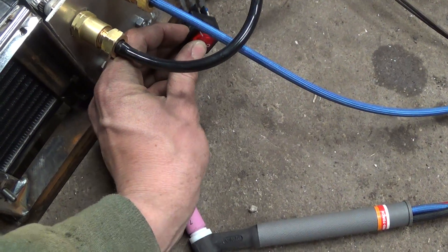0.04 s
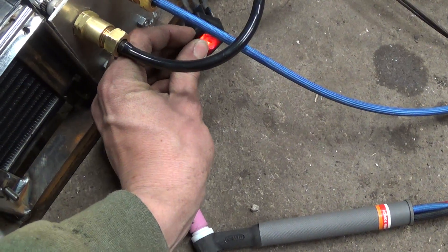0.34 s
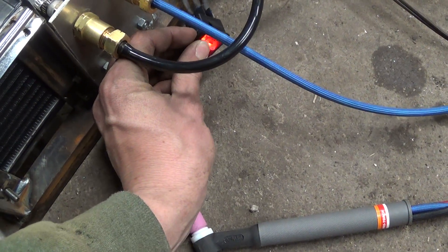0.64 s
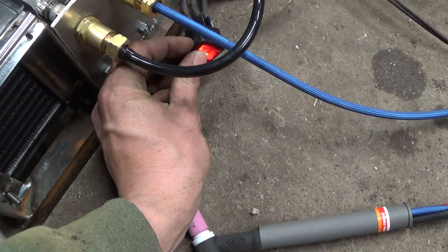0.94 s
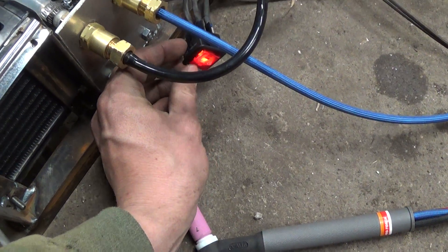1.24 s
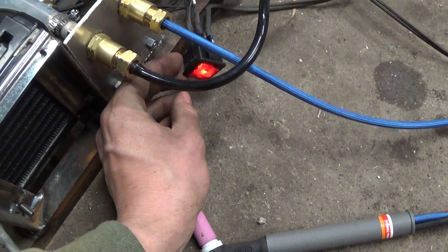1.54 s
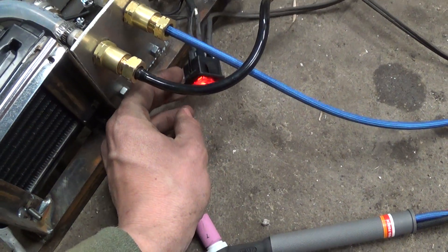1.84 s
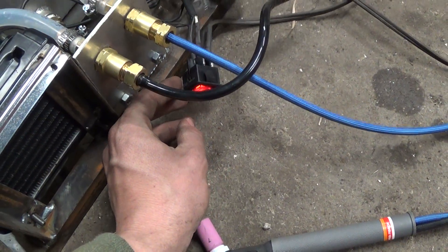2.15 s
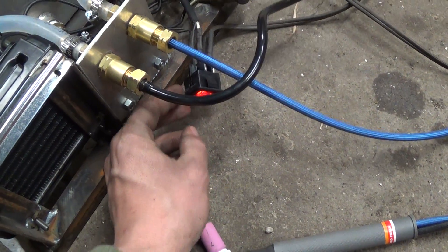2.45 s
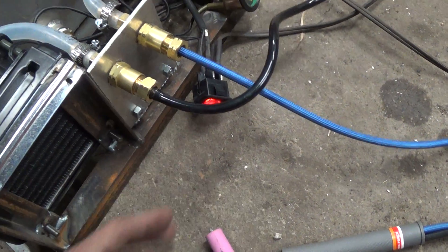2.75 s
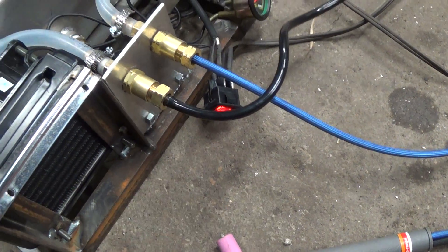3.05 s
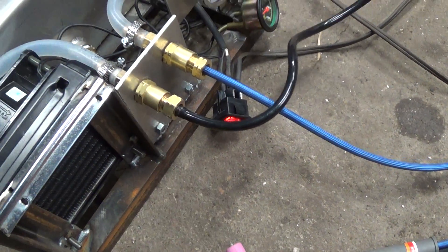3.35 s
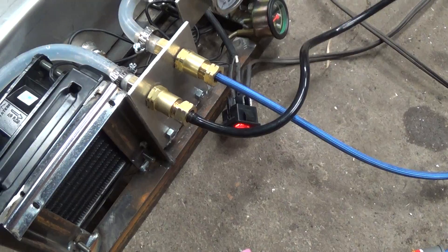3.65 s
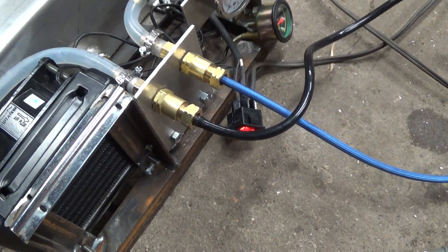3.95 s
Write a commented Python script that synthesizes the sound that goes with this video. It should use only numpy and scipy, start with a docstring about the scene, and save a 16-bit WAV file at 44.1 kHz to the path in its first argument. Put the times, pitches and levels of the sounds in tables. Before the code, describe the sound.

A small coolant pump and fan hum and whir close by in a quiet workshop. After a near-silent start, a rocker switch snaps at about 0.4 seconds and the motor comes on with a brief whoosh. A steady low hum, rushing air, fine crackle and light rattle continue until 4 seconds. The hiss brightens slightly from 1.5 seconds, with scattered small ticks, faint squeaks and a soft rub around 3.4.

```python
"""A faint tick in a quiet workshop, then a rocker switch snaps and a small coolant pump and fan start.
Magnetic force makes the motor hum at twice the mains rate, and the turning shaft adds sidebands.
Noise swells briefly after the click; the fan rushes, the pump rasps in step with the hum, bubbles
crackle and a loose part rattles. The hiss opens up as the hand leaves the switch. Small ticks and
squeaks come from the running unit, and a soft rub is heard near the end."""
import sys
import numpy as np
from scipy import signal
from scipy.fft import rfft, irfft
from scipy.io import wavfile

SR = 44100
rng = np.random.default_rng(int(sys.argv[2]) if len(sys.argv) > 2 else 0)


def output_pcm(signal):
    """Save a mono or channel-first signal as 16-bit PCM at the path in sys.argv[1].

    Samples are clipped to [-1, 1] before scaling.
    """
    pcm = np.clip(np.atleast_2d(signal).T, -1, 1) * 32767
    wavfile.write(sys.argv[1], SR, np.round(pcm).astype(np.int16))


N = 176400
T = np.arange(N) / SR
HZ = np.maximum(np.arange(N // 2 + 1) * SR / N, 1)

HUM_HZ, SHAFT_HZ, FAN_HZ = 120.02, 29.72, 142.6
SWITCH_S, START_S = .3665, .372
SPIN_UP_S, TONE_RISE_S, RUSH_RISE_S = .24, .076, .087  # time constants

# Workshop background spectrum: f/Hz, density/(dB per Hz)
ROOM_SPECTRUM = [(25, -81), (100, -79.5), (250, -80.5), (600, -85.5), (1200, -95), (3000, -99),
                 (6000, -103), (16000, -107)]
# Diffuse share of airborne noise: f/Hz, side level re mid/dB
DIFFUSE_SHARE = [(25, -10), (100, -24), (600, -20), (1200, -16), (4000, -14), (12000, -18)]
# Ticks from the unit: t/s, level/dB, centre f/Hz
TICK_EVENTS = [(.231, -45, 3370), (0.462, -22, 8000), (0.699, -27, 2800), (1.298, -32, 6000),
               (1.474, -26, 4600), (2.308, -23, 3830), (2.441, -23, 4200), (2.71, -20.5, 7000),
               (3.07, -29, 4100), (3.283, -24.5, 4670), (3.655, -31, 5100), (3.829, -26, 9000)]
# Modes of the switch body: f/Hz, level/dB, t60/s
ROCKER_MODES = [(1900, -41, .012), (3120, -10.5, 0.031), (5965, -17, 0.014), (7600, -8, 0.0073),
                (8230, 2.5, 0.0074), (9000, -9, 0.013), (10400, -0.5, 0.0081), (14340, -15, .006)]
# Reverberation of the click: f/Hz, density/(dB per Hz)
ECHO_SPECTRUM = [(200, -63), (1000, -83), (2200, -61), (3100, -64), (4200, -67), (6500, -61), (8400, -58),
                 (10500, -62), (12500, -68), (16000, -82)]
# Motor and pump tones: order (nearest multiple of the full shaft rate), relative level/dB
MOTOR_ORDERS = [(1, -37), (2, -35), (3, -28), (4, 0), (5, -18), (6, -33), (7, -29), (8, -14), (9, -24),
                (10, -36), (11, -28), (12, -28), (13, -31), (14, -32), (15, -23), (16, -20), (17, -30),
                (18, -27), (19, -27), (20, -25), (21, -32), (22, -19), (23, -16), (24, -33), (25, -30),
                (26, -26), (27, -33), (28, -29), (29, -33), (30, -31), (31, -32)]
# Envelope of the hum's fundamental: t/s, level/dB
HUM_ENVELOPE = [(.372, -52), (.39, -38), (.434, -28), (.465, -23), (.497, -15), (.55, -14.5), (1.5, -15),
                (2.6, -15), (2.76, -16.5), (2.9, -15), (3.45, -15.5), (3.66, -16.5), (3.95, -14.5)]
# Envelope of the beating pair, orders 22 and 23: t/s, gain/dB
DRONE_ENVELOPE = [(.4, 1), (.9, 0.5), (1.35, 2.5), (2.15, 0.5), (2.4, -1), (2.6, 0), (2.8, -2), (2.98, 1),
                  (3.25, -3.5), (3.55, 2), (3.8, 2), (4, -2)]
# Flow noise of fan and pump: f/Hz, density/(dB per Hz)
FLOW_SPECTRUM = [(25, -68), (70, -70), (125, -53.5), (200, -66.5), (320, -65.5), (550, -59), (950, -63.5),
                 (1600, -62.5), (2150, -62), (2750, -68.5), (3700, -73.5), (5800, -77.5), (8400, -81.5),
                 (10600, -80), (11800, -83.5), (13200, -94), (16000, -104)]
# Resonances of housing and radiator: f/Hz, width/Hz, lift/dB
HOUSING_RESONANCES = [(145, 19, 7), (540, 8.6, 5), (692, 31, 9.5), (1251, 11, 13), (2067, 110, 7),
                      (2390, 36, 4), (2593, 22, 11), (2987, 75, 7), (3403, 28, 9.5), (6370, 220, 7),
                      (6770, 175, 9.5), (7560, 230, 3)]
# Envelope of the treble: t/s, gain/dB
TREBLE_ENVELOPE = [(.4, 2.5), (.6, -0.5), (1.1, -3), (1.38, -1.5), (1.6, 1.5), (2.2, -0.5), (2.7, 2),
                   (3.4, 2.5), (3.7, 3.5), (4, 0.5)]
# Ringing tones of the housing: f/Hz, width/Hz, level/dB
WHINE_BANDS = [(1850, 19, -43), (1882, 7.9, -40)]
# Envelope of those tones: t/s, gain/dB
WHINE_ENVELOPE = [(.4, -3), (2.3, 1), (2.8, 2), (3.6, 6), (4, 4.5)]
# Modes of the pump head: f/Hz, level/dB, t60/s
PUMP_HEAD_MODES = [(4090, -49, 0.0029), (6060, -60, .008), (7600, -51.5, 0.0083), (9500, -53, 0.0048),
                   (10600, -55, 0.0046)]
# Modes of a loose pump part: f/Hz, relative level/dB, t60/s
LOOSE_PART_MODES = [(2110, -5.5, 0.019), (2130, 1.5, 0.0097), (2524, -15.5, 0.015)]
# Brief swell of noise after the click: f/Hz, density/(dB per Hz)
SWELL_SPECTRUM = [(60, -58), (150, -47), (350, -44), (480, -59), (690, -38), (900, -72), (1280, -46),
                  (1650, -74), (2400, -61), (4000, -66), (6000, -64.5), (10000, -71), (13000, -78),
                  (16000, -93)]
# Squeaks from the unit: t/s, 1/e half length/s, f/Hz, level/dB
SQUEAK_EVENTS = [(0.413, 0.029, 3040, -37.5), (0.432, .008, 1270, -27), (0.464, 0.0064, 2390, -23.5),
                 (0.47, 0.0023, 5550, -30), (2.114, .003, 5140, -32), (3.1, 0.033, 4000, -43),
                 (3.44, 0.016, 3000, -29), (3.505, .012, 3200, -31)]
# Resonances of the rub: f/Hz, width/Hz, level/dB
RUB_BANDS = [(2580, 600, -32), (3000, 300, -38), (3150, 500, -37), (9000, 3500, -44)]
# Phase between the microphone ports: f/Hz, left minus right/rad
LEFT_PHASE = [(20, -1.3), (120, -0.88), (240, -1.35), (680, -1.545), (1200, -1.2), (2100, -0.68),
              (3700, -0.68), (6500, -0.31), (16000, -0.33)]
# Balance of the ports: f/Hz, left minus right/dB
LEFT_BALANCE = [(120, -0.5), (400, -0.7), (1200, -0.3), (3000, 1.5), (12000, 0)]


def from_db(db):
    """Amplitude ratio of a level in decibels."""
    return 10 ** (np.asarray(db) / 20)


def in_time(rows):
    """Linear interpolation over time."""
    return np.interp(T, *np.transpose(rows))


def over_hz(rows):
    """Linear interpolation over log frequency."""
    hz, value = np.transpose(rows)
    return np.interp(np.log(HZ), np.log(hz), value)


def rise(start, seconds):
    """First-order step response, from 0 towards 1."""
    return 1 - np.exp(-np.maximum(T - start, 0) / seconds)


def decay(start, t60):
    """Exponential damping: a sudden onset, then 60 dB lost every t60."""
    return (T > start) * np.exp(-np.log(1000) * np.maximum(T - start, 0) / t60)


def band_noise(hz, width_hz):
    """Resonance selects a band of noise, rms 1; around 0 Hz it is a random drift."""
    x = irfft(rfft(rng.standard_normal(N)) / (1 + (2 * (HZ - hz) / width_hz) ** 2), N)
    return x / np.std(x)


def air_noise(density_db):
    """Partly coherent stereo noise: a common field plus a diffuse one."""
    mid, side = rfft(rng.standard_normal((2, N))) * from_db(density_db) * np.sqrt(SR / 2)
    side = side * from_db(over_hz(DIFFUSE_SHARE))
    return irfft(np.array([mid + side, mid - side]), N)


def above(x, hz):
    """Zero-phase high-pass filter."""
    return irfft(rfft(x) / (1 + (hz / HZ) ** 6), N)


def ring(clicks, hz, t60):
    """Damped oscillator: each impulse starts a decaying sine."""
    r, w = np.exp(-np.log(1000) / (t60 * SR)), 2 * np.pi * hz / SR
    return signal.lfilter([0, np.sin(w)], [1, -2 * r * np.cos(w), r * r], clicks + 1e-18)


def sway(rate_hz):
    """Low-passed noise gives two slow, independent drifts of spread 1."""
    times = np.linspace(0, T[-1], num=800)
    white = rng.standard_normal((2, len(times)))
    hz = np.arange(len(times) // 2 + 1) / T[-1]
    drifts = irfft(rfft(white) / (1 + (hz / rate_hz) ** 2), len(times))
    return [np.interp(T, times, row / np.std(row)) for row in drifts]


def workshop():
    """Stationary background noise, strongest in the bass."""
    return air_noise(over_hz(ROOM_SPECTRUM))


def ticks():
    """Heavily damped transients, each a broad band of noise around its own pitch."""
    bursts = sum(from_db(db) * decay(start, t60=.035) * band_noise(hz, .7 * hz)
                 for start, db, hz in TICK_EVENTS)
    return signal.sosfilt(signal.butter(4, 10100, fs=SR, output="sos"), bursts)


def switch():
    """Impact excitation: the rocker touches, snaps home and rings; the workshop reverberates."""
    clicks = np.zeros(N)
    clicks[int(SWITCH_S * SR)] = from_db(-34.5)
    clicks[int((SWITCH_S + .00048) * SR)] = from_db(-14.5)
    snap = sum(from_db(db) * ring(clicks, hz, t60) for hz, db, t60 in ROCKER_MODES)
    snap = signal.sosfilt(signal.butter(2, 1510, "high", fs=SR, output="sos"), snap)
    tail = rise(SWITCH_S, .01) ** 2 * decay(SWITCH_S, t60=.28)
    return snap + tail * air_noise(over_hz(ECHO_SPECTRUM))


def motor(hum_phase, shaft_phase):
    """Modulation: shaft rotation sets sidebands beside the harmonics of the magnetic hum."""
    tones, running = 0, from_db(-14.5) * rise(START_S, TONE_RISE_S)
    for order, db in MOTOR_ORDERS:
        harmonic = (order + 1) // 4  # every fourth order is a harmonic of the hum
        sideband = order - 4 * harmonic
        level, waver = running, (.27 if sideband else .14)
        if order == 4:  # the fundamental is the steadiest
            level, waver = from_db(in_time(HUM_ENVELOPE)) * (T > START_S), .03
        if order in (22, 23):
            level, waver = running * from_db(in_time(DRONE_ENVELOPE)), .14
        phase = harmonic * hum_phase + sideband * shaft_phase
        if sideband or harmonic > 2:
            phase += rng.uniform(0, 2 * np.pi)
        swell, lead = sway(rate_hz=2.5)
        amplitude = np.sqrt(2) * level * from_db(db) * (1 + waver * swell)
        tones += amplitude * np.cos(phase + waver * lead)
    return tones


def buzz(hum_phase, shaft_phase):
    """The harmonic series of the hum continues faintly upward, with shaft sidebands."""
    tones = 0
    for harmonic in range(8, 22):
        for sideband in (-1, 0, 1, 2):
            level = from_db(-55.5 + 3.5 * rng.standard_normal())
            phase = harmonic * hum_phase + sideband * shaft_phase
            tones += level * np.cos(phase + rng.uniform(0, 2 * np.pi))
    return np.sqrt(2) * rise(START_S, TONE_RISE_S) * tones


def fan():
    """Blade-passing tone: frequency grows with speed, amplitude with its square."""
    speed = rise(START_S, SPIN_UP_S)
    phase = 2 * np.pi * FAN_HZ * np.cumsum(speed) / SR
    return np.sqrt(2) * from_db(-46) * speed ** 2 * np.sin(phase)


def rush(hum_phase, shaft_phase):
    """Housing resonances colour the flow noise; the motor modulates its upper part into a rasp."""
    lift = sum((from_db(db) - 1) / (1 + (2 * (HZ - hz) / width) ** 2)
               for hz, width, db in HOUSING_RESONANCES)
    flow = air_noise(over_hz(FLOW_SPECTRUM) + 20 * np.log10(1 + lift)) + crackle()
    upper, treble, top = (above(flow, hz) for hz in (1020, 3000, 11000))
    # The low rush is louder until the flow settles.
    churn = from_db(12 * (1 - rise(START_S, .4))) * (flow - upper)
    pulsation = 1 + .097 * np.cos(hum_phase) + .062 * np.cos(shaft_phase)
    chatter = np.cos(2 * hum_phase) + np.cos(2 * hum_phase - shaft_phase)
    chatter += .5 * np.cos(hum_phase - shaft_phase)
    rasp = (1 + .16 * chatter) * (upper - treble)
    flutter = from_db(1.5 * band_noise(0, 70))
    treble_db = in_time(TREBLE_ENVELOPE)
    # The top of the spectrum swings further than the rest of the treble.
    hiss = flutter * (from_db(treble_db) * (treble - top) + from_db(1.4 * treble_db) * top)
    return rise(START_S, RUSH_RISE_S) * (churn + pulsation * (rasp + hiss) + housing_whine())


def crackle(per_second=150):
    """Bubbles collapse at random in the coolant and excite the modes of the pump head."""
    collapses = rng.random(N) < per_second / SR
    clicks = collapses * from_db(2 * np.minimum(rng.exponential(1, N), 3))
    modes = [(db, ring(clicks * rng.standard_normal(N), hz, t60)) for hz, db, t60 in PUMP_HEAD_MODES]
    return sum(from_db(db) * mode / np.std(mode) for db, mode in modes)


def housing_whine():
    """Sharp resonances of the housing narrow noise into wavering tones."""
    tones = sum(from_db(db) * band_noise(hz, width) for hz, width, db in WHINE_BANDS)
    return from_db(in_time(WHINE_ENVELOPE)) * tones


def rattle(hum_phase, jitter_s=.0002):
    """Forced vibration: a loose part is knocked once per hum cycle, a little unevenly."""
    cycle_starts = T[1:][np.diff(hum_phase // (2 * np.pi)) > 0]
    lateness, knock_db = np.clip(rng.standard_normal((len(cycle_starts), 2)), -2, 2).T
    knock_times = cycle_starts + jitter_s * lateness
    clicks = np.zeros(N)
    clicks[np.clip(knock_times * SR, 0, N - 1).astype(int)] = from_db(knock_db)
    ringing = np.gradient(sum(from_db(db) * ring(clicks, hz, t60) for hz, db, t60 in LOOSE_PART_MODES))
    return from_db(-40) * rise(START_S, RUSH_RISE_S) * ringing / np.std(ringing)


def sizzle():
    """Random amplitude modulation gathers the coolant's sizzle into short clusters."""
    clusters_db = 3.5 * np.clip(band_noise(0, 38), -2, 2)
    level = from_db(-49 + in_time(TREBLE_ENVELOPE) + clusters_db)
    return rise(START_S, SPIN_UP_S) * level * band_noise(5170, 300)


def noise_swell(peak_s=.473, rise_s=.057, fall_s=.034):
    """A brief burst of broadband noise swells and fades exponentially just after the click."""
    swell = np.exp(-np.maximum((peak_s - T) / rise_s, (T - peak_s) / fall_s))
    return rise(START_S, .015) * swell * air_noise(over_hz(SWELL_SPECTRUM))


def squeaks():
    """Narrow-band noise is heard as pitch; each squeak swells and fades in a Gaussian envelope."""
    return sum(from_db(db) * np.exp(-((T - peak_s) / half_s) ** 2) * band_noise(hz, width_hz=190)
               for peak_s, half_s, hz, db in SQUEAK_EVENTS)


def rub(peak_s=3.44, half_s=.12):
    """Friction: one soft, uneven scrape excites broad resonances of the unit."""
    stroke = np.exp(-((T - peak_s) / half_s) ** 2)
    roughness = from_db(1.5 * band_noise(0, 80))
    return stroke * roughness * sum(from_db(db) * band_noise(hz, width) for hz, width, db in RUB_BANDS)


def scene():
    """Superposition of the quiet workshop, the switch and the running unit."""
    hum_phase = 2 * np.pi * HUM_HZ * T
    shaft_phase = 2 * np.pi * np.cumsum(SHAFT_HZ * rise(START_S, SPIN_UP_S)) / SR
    tones = motor(hum_phase, shaft_phase) + buzz(hum_phase, shaft_phase) + fan()
    noises = rush(hum_phase, shaft_phase) + rattle(hum_phase) + sizzle() + noise_swell()
    return tones + noises + switch() + ticks() + squeaks() + rub() + workshop()


def record(dry):
    """Phase difference at two close ports, the left lagging; a faint electronic whine; a low-pass."""
    pan = from_db(over_hz(LEFT_BALANCE) / 2)
    response = np.array([pan * np.exp(1j * over_hz(LEFT_PHASE)), 1 / pan])
    taps = np.roll(irfft(response, N), 512, axis=1)[:, :1025] * np.hanning(1025)
    ports = signal.fftconvolve(dry, taps, "same", axes=1)
    whine = from_db(-70) * np.sin(2 * np.pi * 15735 * T)
    return signal.sosfilt(signal.ellip(10, .1, 80, 15900, fs=SR, output="sos"), ports + whine)


dry = scene()
out = record(dry)
output_pcm(out)
```